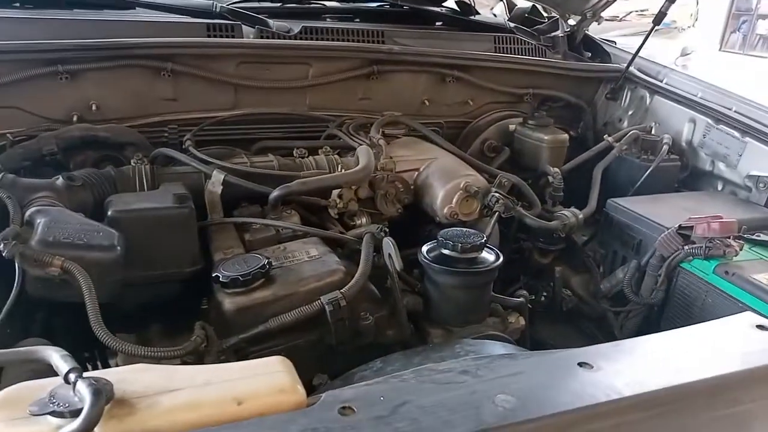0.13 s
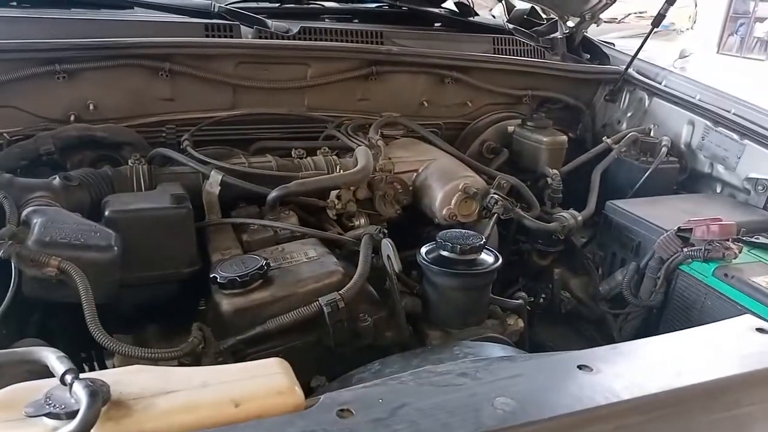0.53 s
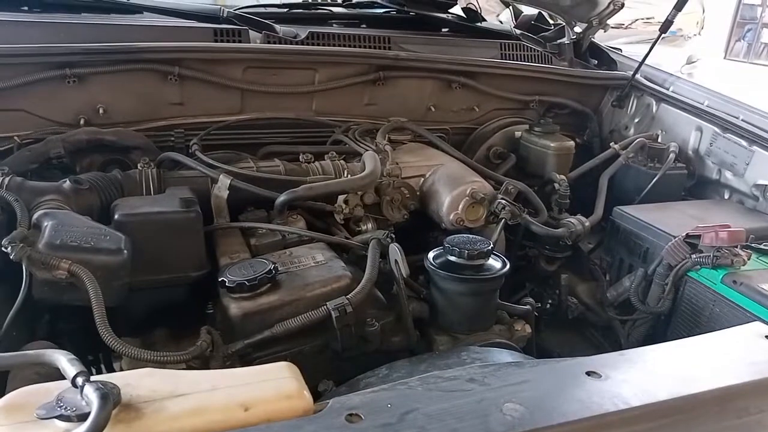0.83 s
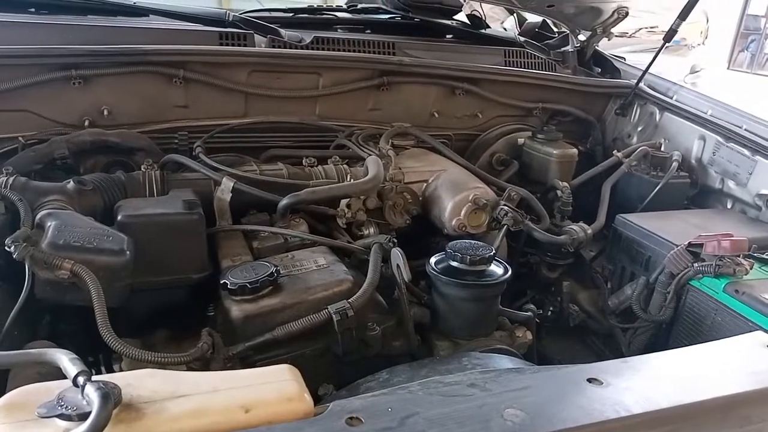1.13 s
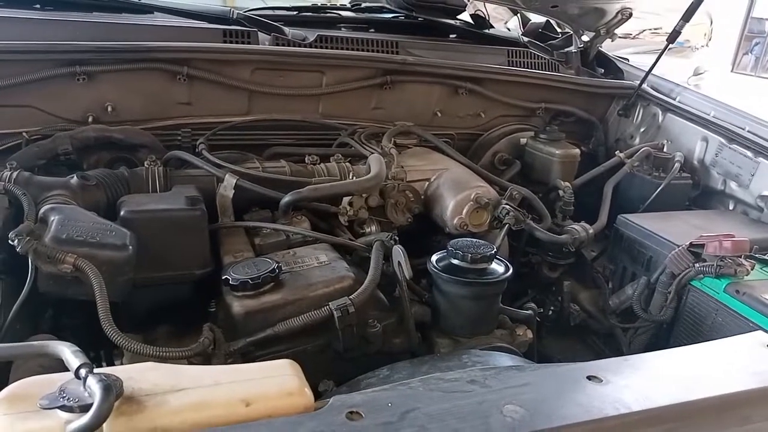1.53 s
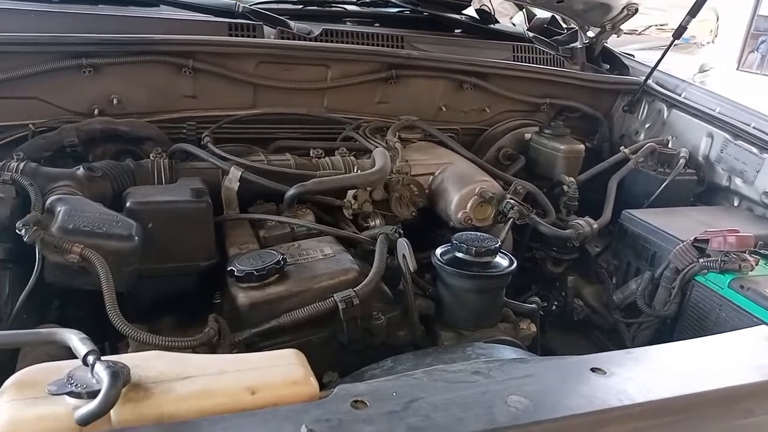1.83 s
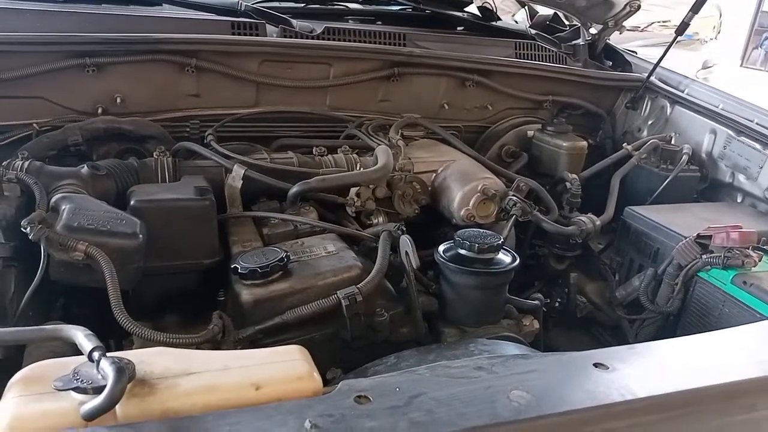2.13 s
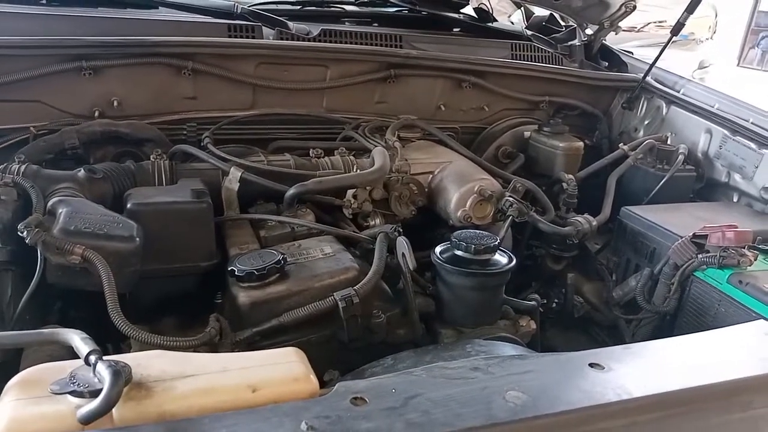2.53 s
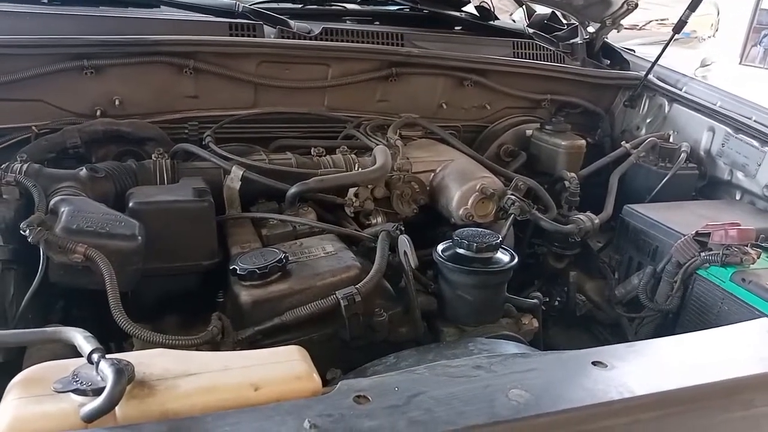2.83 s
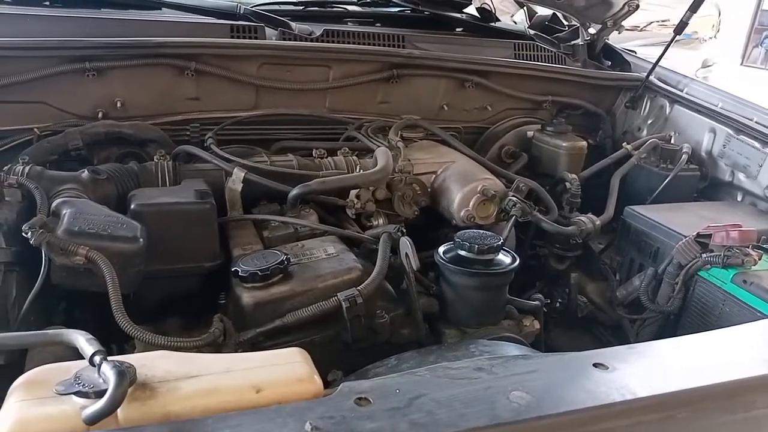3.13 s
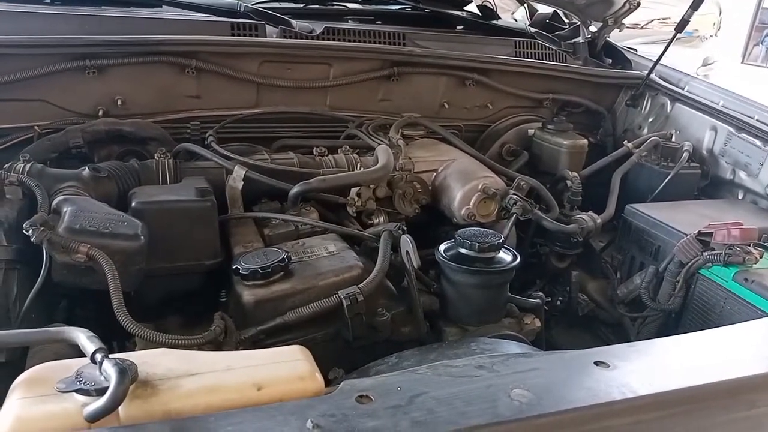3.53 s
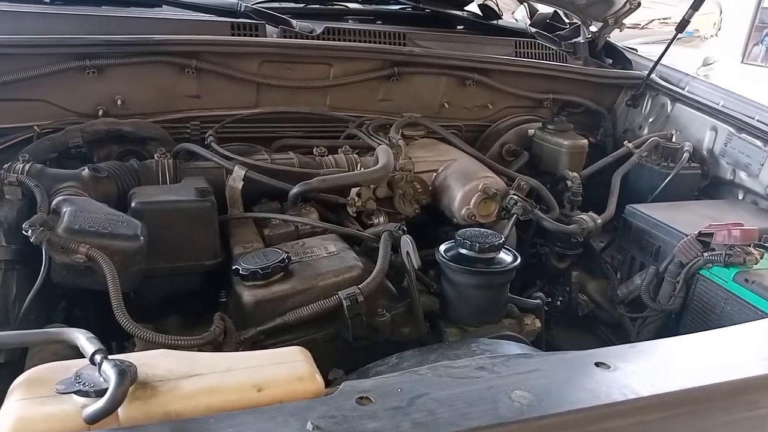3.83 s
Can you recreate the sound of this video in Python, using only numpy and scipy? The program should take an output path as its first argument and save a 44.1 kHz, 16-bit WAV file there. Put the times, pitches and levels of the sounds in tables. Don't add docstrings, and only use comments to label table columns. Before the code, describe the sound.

A diesel engine starts, heard close over an open engine bay: faint pump hum and air hiss first, then a hard metallic clank, squealing grinding starter strokes, and the engine catching with rumble, knock and clatter.

```python
import sys
import numpy as np
from scipy import signal
from scipy.fft import rfft, irfft, next_fast_len
from scipy.io import wavfile
from scipy.ndimage import map_coordinates

SR = 44100
rng = np.random.default_rng(int(sys.argv[2]) if len(sys.argv) > 2 else 0)


def master(y):
    cut = np.clip(np.atleast_2d(y).T, -1, 1)
    pcm = np.round(cut * 32767)
    wavfile.write(sys.argv[1], SR, pcm.astype(np.int16))


def field_ratio(decibels):
    return 10 ** (np.asarray(decibels, dtype=float) / 20)


N = 176400
T = np.arange(N) / SR

# start_s, peak_db
SLAM_HITS = [
    (2.3429, -4.5),
    (2.349, 2.5),
    (2.356, -1),
    (2.361, 0.5),
    (2.377, -6.5),
]


def unit(x):
    return x / np.sqrt(np.mean(x ** 2) + 1e-20)


def curves(rows):
    s, *columns = np.transpose(rows)
    return [np.interp(T, s, column) for column in columns]


def fade(start, end, soft):
    return np.clip(np.minimum(T - start, end - T) / soft, 0, 1)


def burst(start, hold, first_db, last_db, fall_db_per_s, attack_s):
    held_db = np.interp(T, [start, start + hold], [first_db, last_db])
    fall_db = fall_db_per_s * np.clip(T - start - hold, 0, 1)
    return field_ratio(held_db - fall_db) * fade(start, 9, attack_s)


def wobble(rate):
    return map_coordinates(rng.standard_normal(int(N * rate / SR) + 4), [T * rate])


def filtered(x, response):
    m = next_fast_len(N + SR // 2)
    return irfft(rfft(x, m) * response(np.fft.rfftfreq(m, 1 / SR)), m)[:N]


def colour(points):
    f, v = np.transpose(points)
    return lambda hz: field_ratio(np.interp(np.log(hz + 1), np.log(f + 1), v))


def resonances(peaks):
    def response(f):
        return sum((-1) ** k * field_ratio(db) * 1j * f * width / (centre * centre - f * f + 1j * f * width)
                   for k, (centre, width, db) in enumerate(peaks))
    return response


def steep_resonances(peaks):
    return lambda f: resonances(peaks)(f) ** 2


def noise(response):
    return unit(filtered(rng.standard_normal(N), response))


def tone(hz, rough, rate):
    level = field_ratio(4.5 * rough * wobble(rate))
    return unit(level * np.sin(2 * np.pi * np.cumsum(hz) / SR + rough * wobble(rate)))


def gear_squeal(mesh, loads, squeal_dbs):
    # multiple, level_db
    squeal_orders = [(12, 0), (24, -7), (30, -10)]
    # centre_hz, width_hz, level_db
    singing = [(2920, 130, 7), (3850, 410, 5), (8960, 1100, 1.5)]
    cry = 0
    for k, db in squeal_orders:
        sounding = 1 if k == 12 else mesh > 290
        cry = cry + field_ratio(db) * tone(k * mesh, .8, 200) * sounding
    cry = filtered(cry, lambda f: .5 + np.abs(resonances(singing)(f)))
    strain = sum(load ** 2 / load.max() * field_ratio(db) for load, db in zip(loads, squeal_dbs))
    return strain * cry


def gear_grind(mesh):
    # frequency_hz, level_db
    grind_colour = [(100, -17), (400, -10.5), (600, -3.5), (1200, 0), (3800, -5.5), (5600, -17),
                    (8680, -14), (12500, -25), (15700, -30)]
    # centre_hz, width_hz, level_db
    housing = [(593.4, 39, -2), (723, 77, -9), (1030, 110, -3), (1256, 79, -2), (1470, 60, -2),
               (1984, 86, -5), (2543, 110, -1.5), (2977, 100, 4.5), (3420, 130, -8), (3884, 52, -2),
               (4480, 300, -24)]
    knocks = 1 + 0.22 * np.cos(2 * np.pi * np.cumsum(mesh) / SR)
    grind = unit(knocks * field_ratio(2.06 * wobble(150)) * noise(colour(grind_colour)))
    clang = unit(sum(field_ratio(mode[2] + 2.4 * wobble(25.04)) * noise(steep_resonances([mode]))
                     for mode in housing))
    return field_ratio(-3) * grind + field_ratio(-8) * clang


def armature_whine():
    # time_s, pitch_hz, level_db
    whine = [(2.42, 5000, -56), (2.5, 6300, -47), (2.55, 7300, -40), (2.61, 7370, -39), (2.7, 7150, -46),
             (2.751, 8400, -43), (2.78, 7350, -47), (2.88, 9000, -41), (2.93, 8900, -68), (3.2, 10200, -70),
             (3.24, 9600, -48), (3.33, 7030, -42), (3.4, 5460, -66)]
    hz, db = curves(whine)
    return fade(whine[0][0], whine[-1][0], .02) * field_ratio(db) * tone(hz, .9, 250)


def flywheel_bell():
    # start_s, length_s, level_db
    booms = [
        (2.635, .045, -21),
        (2.883, .035, -21),
    ]
    level = sum(burst(s, hold, db, db, 220, 0.0057) for s, hold, db in booms)
    return level * tone(592 + 0 * T, 0.74, 70)


def starter():
    # start_s, length_s, first_db, last_db, squeal_db
    strokes = [
        (2.37, 0.108, -29, -23.5, 0),
        (2.553, 0.093, -22.5, -16, -2.5),
        (2.752, 0.029, -12, -14, -10),
        (2.878, 0.04, -14, -15.5, -10),
    ]
    # time_s, teeth_per_s
    mesh_rate = [(2.4, 200), (2.42, 212), (2.45, 232), (2.465, 240), (2.476, 247), (2.49, 258), (2.53, 266),
                 (2.556, 350), (2.605, 345), (2.622, 335), (2.637, 319), (2.652, 311), (2.675, 302),
                 (2.74, 295), (2.753, 382), (2.765, 366), (2.79, 353), (2.87, 350), (2.882, 400),
                 (2.9, 374), (2.93, 368)]
    # multiple, level_db
    teeth_orders = [(1, -7), (2, -1), (3, 1.5), (4, -2.5), (5, -7.5), (6, -5), (7, -14), (8, -4.5)]
    loads = [burst(*stroke[:4], fall_db_per_s=308, attack_s=0.0046) for stroke in strokes]
    load = sum(loads)
    spin = field_ratio(-23.5) * fade(2.325, 2.99, 0.03)
    mesh = curves(mesh_rate)[0] * (1 + .004 * wobble(70))
    teeth = sum(field_ratio(db) * tone(k * mesh, 0.75, 90) for k, db in teeth_orders)
    teeth = unit(np.clip(mesh / 100 - 2.4, 0, 1) * teeth)
    gears = field_ratio(-5) * load * teeth + (load + spin) * gear_grind(mesh)
    squeal = gear_squeal(mesh, loads, [stroke[-1] for stroke in strokes])
    steel = squeal + gears + armature_whine() + flywheel_bell()
    return filtered(steel, colour([(40, -30), (150, -4), (330, -2)]))


def pinion():
    # pitch_hz, level_db, t60_s
    slam_modes = [(1050, -17, 0.085), (1296, 1, 0.076), (1481, -5, 0.13), (2100, -14, .06),
                  (2890, -1, 0.05), (3120, -4, .07), (3420, -4.5, 0.039)]
    crack_colour = colour([(100, -36), (400, -5.5), (1200, 10.0), (4000, -1.5), (6000, -14),
                           (9000, -11.0), (15000, -28)])
    out = 0
    for s, db in SLAM_HITS:
        t = np.clip(T - s, 0, None)
        ring = sum(field_ratio(level + rng.normal(0, 2) - 60 * t / t60) * np.sin(2 * np.pi * hz * t)
                   for hz, level, t60 in slam_modes)
        crack = field_ratio(-8.5 - 60 * t / 0.041) * noise(crack_colour)
        attack = 1 - np.exp(-t / 0.00056)
        out = out + field_ratio(db) * attack * (field_ratio(-12) * ring + crack)
    t = np.clip(T - SLAM_HITS[0][0], 0, None)
    click = (t > 0) * field_ratio(-16.5 - 60 * t / 0.038) * noise(colour([(3000, -25), (9500, 6), (15000, -8)]))
    return out + click


def bay(x):
    t = np.arange(SR // 4) / SR
    tail = rng.standard_normal(len(t)) * field_ratio(-60 * t / 0.3)
    return signal.fftconvolve(x, tail / np.linalg.norm(tail))[:N]


def intake_and_block(phase, gate):
    # centre_hz, width_hz, level_db
    intake = [(146, 64, -5), (192.5, 46, -0.5), (256, 23.4, 1), (310.6, 20, 0), (383.4, 16.5, -1.5),
              (610, 110, -12.5)]
    # centre_hz, width_hz, level_db
    block = [(300, 60, 1), (393, 74, 2.5), (575, 90, -1), (723, 84, -0.5), (960, 153, -0.5),
             (1270, 156, -3.5)]
    # frequency_hz, level_db
    body_colour = [(35, -50), (60, -13.5), (186, -5), (222, -9), (380, -9), (465, -9), (1500, -13.5),
                   (1950, -14), (3300, -120)]
    fired = np.diff(np.floor(phase), prepend=0) > 0
    taps = np.diff(np.floor(3 * phase + .25 * wobble(150)), prepend=0) > 0
    pulses = unit(filtered(fired * field_ratio(3.2 * wobble(60)), resonances(intake)))
    blows = taps * field_ratio(2.5 * rng.standard_normal(N)) + .06 * rng.standard_normal(N)
    knock = unit(filtered(blows, resonances(block)))
    boom = field_ratio(1.1 * wobble(25.1)) * noise(resonances(intake))
    body = unit(gate * field_ratio(1.8 * wobble(20)) * noise(colour(body_colour)))
    return field_ratio(-8) * pulses + field_ratio(-6) * knock + field_ratio(-3) * body + field_ratio(-5.5) * boom


def firing_tones(rate, third_db):
    sixth_db = -4.5 + 16 * np.minimum(T - 3.75, 0)
    sixth = field_ratio(sixth_db) * tone(6 * rate, 0.5, 35)
    ninth = field_ratio(-18) * (T > 3.6) * tone(9 * rate, 0.59, 30)
    steady = field_ratio(third_db) * (tone(3 * rate, 0.18, 30.1) + sixth + ninth)
    passing = fade(3.56, 3.72, 0.035) * (tone(5 * rate, 0.38, 30) + tone(6.1 * rate, 0.33, 30))
    return steady + field_ratio(-25) * passing


def clatter(gate):
    # frequency_hz, level_db
    clatter_colour = [(290, -39), (500, -14), (1970, -7), (2440, -10), (3880, -12), (5640, -26),
                      (8820, -21.5), (12500, -36), (15700, -41)]
    ticks = noise(colour([(200, -37)] + list(clatter_colour)))
    return unit(gate * field_ratio(0.57 * wobble(300)) * ticks)


def overrun_and_belt():
    overrun = field_ratio(-31) * fade(0, 3.316, 0.11) * field_ratio(2.2 * wobble(35))
    ring = overrun * field_ratio(2.5) * noise(steep_resonances([(2960, 120, 0)]))
    hiss = noise(colour([(5000, -3.5), (8000, 4.0), (12000, -0.5), (14000, 3.5), (15700, -6.0)]))
    return ring + (overrun + field_ratio(-37.5)) * field_ratio(1.5 * wobble(90)) * hiss


def valve_spit():
    start_s, spits_per_s = 3.025, 20.3
    level = field_ratio(-40 - 20 * ((T - start_s) * spits_per_s % 1))
    return level * fade(start_s, 3.5, .002) * noise(colour([(9000, -30), (13500, -4), (15000, 0)]))


def engine():
    # time_s, firings_per_s, third_multiple_db
    firing = [(3.22, 40.5, -31), (3.3, 41, -19), (3.38, 47.3, -19.5), (3.46, 49, -23.5), (3.55, 58.5, -29),
              (3.64, 63.7, -33), (3.72, 62.5, -16), (3.78, 63, -26), (3.86, 66, -18.5), (4, 63, -28)]
    # time_s, intake_db, clatter_db
    roar = [(2.955, -23, -23), (3.0, -22, -17), (3.13, -24.5, -19), (3.37, -18.5, -19.5), (3.6, -13.5, -19),
            (3.88, -13, -19.5), (4, -14.5, -21)]
    catch_s, catch_rate = 2.955, 32
    rate, third_db = curves([(catch_s, catch_rate, -45)] + list(firing))
    intake_db, clatter_db = curves(roar)
    phase = np.cumsum(rate) / SR + 0.0894 * wobble(40)
    gate = 1 + 0.12 * np.exp(-3 * (phase % 1))
    running = field_ratio(intake_db) * intake_and_block(phase, gate) + firing_tones(rate, third_db)
    running = running + field_ratio(clatter_db - 1.0) * clatter(gate) + overrun_and_belt() + valve_spit()
    puff = fade(2.77, 2.95, 0.016) * field_ratio(-35.5) * noise(resonances([(138, 25, 0)]))
    return filtered(fade(catch_s, 9, 0.011) * running + puff, colour([(30, -2), (65, -10), (95, -0.5)]))


def pipe_air():
    # time_s, flow_db
    flow = [(0, -51), (.07, -54), (1.74, -54), (1.78, -50), (1.885, -55.5), (1.905, -48.5), (2.08, -45),
            (2.3, -48)]
    # frequency_hz, level_db
    air_colour = [(120, -46), (200, -24), (489, -12), (816, -20.5), (1520, -16), (6190, -32), (8920, -15.5),
                  (13800, -30), (15700, -24.5)]
    # centre_hz, width_hz, level_db
    pipe = [(1538, 71, 0), (1984, 69, -4.5), (2587, 147, -2), (3641, 93, -0.5), (4610, 200, -3.5),
            (5645, 103, -3), (5845, 31, -1.5), (6640, 340, -7), (7700, 240, -8), (8790, 260, -2.5)]
    flow_db, = curves(flow)
    hiss = field_ratio(6) * noise(colour(air_colour))
    return field_ratio(flow_db) * (hiss + field_ratio(5 + 0.17 * wobble(11.7)) * noise(steep_resonances(pipe)))


def pump():
    # time_s, level_db
    pump_level = [(0, -39.5), (.17, -50.5), (1.1, -47), (1.64, -42), (1.89, -52), (2.01, -41), (2.3, -46)]
    db, = curves(pump_level)
    hz = 486.4 + wobble(2.03)
    octave = field_ratio(db.mean() - 14.5) * tone(2 * hz, 0.33, 20)
    return field_ratio(db) * tone(hz, 0.36, 25.24) + octave


def bird():
    # time_s, pitch_hz, level_db
    call = [(.78, 4100, -76), (.89, 4100, -54.5), (1.0, 3990, -61), (1.1, 3900, -54), (1.25, 3820, -57),
            (1.45, 3770, -80)]
    hz, db = curves(call)
    whistle = tone(hz * (1 + 0.006 * wobble(60)), 0.9, 150)
    return fade(call[0][0], call[-1][0], .03) * field_ratio(db) * whistle


def yard():
    # centre_hz, width_hz, level_db
    machinery = [(89, 9.1, -0.5), (115.3, 12.8, -1), (143.5, 9.7, 2), (274, 385, -8)]
    rumble = field_ratio(-44 - 2.5 * wobble(6.71)) * noise(steep_resonances(machinery))
    return rumble + field_ratio(-59.5) * noise(colour([(20, -6), (70, 11), (300, -1), (800, -24)]))


def background():
    sag = field_ratio(-15 * (T > SLAM_HITS[0][0]))
    return (pipe_air() + pump()) * sag + yard() + bird()


def scene():
    steel = starter() + pinion()
    return (steel + field_ratio(-7.5) * bay(steel) + engine() + background())[None]


def roll_off(x):
    return signal.sosfilt(signal.butter(12, 16870, fs=SR, output="sos"), x)


def record(dry):
    # frequency_hz, level_db
    mic = [(20, -2), (60, 4), (90, 1), (5000, -0.5), (6200, -6), (8700, -1.5), (13500, -12), (15300, 0.5)]
    ceiling, top_hz = .95, 15740
    x = filtered(dry[0], colour(mic))
    limited = x / (1 + np.abs(x / ceiling) ** 4) ** (1 / 4)
    x = filtered(limited, lambda hz: hz < top_hz)
    return roll_off(x[None])


dry = scene()
out = record(dry)
master(out)
```